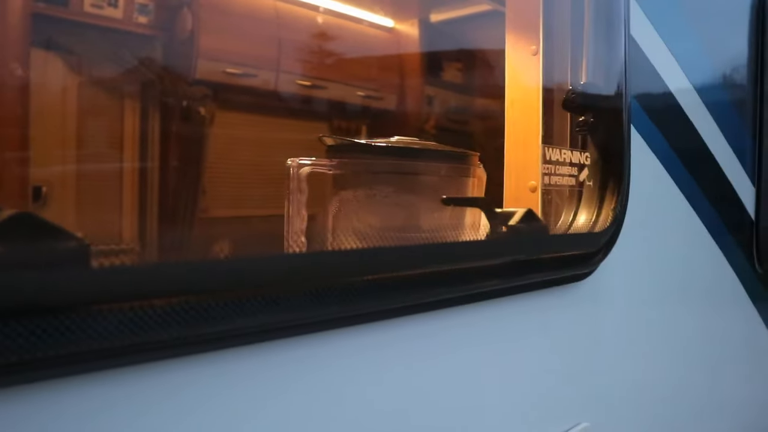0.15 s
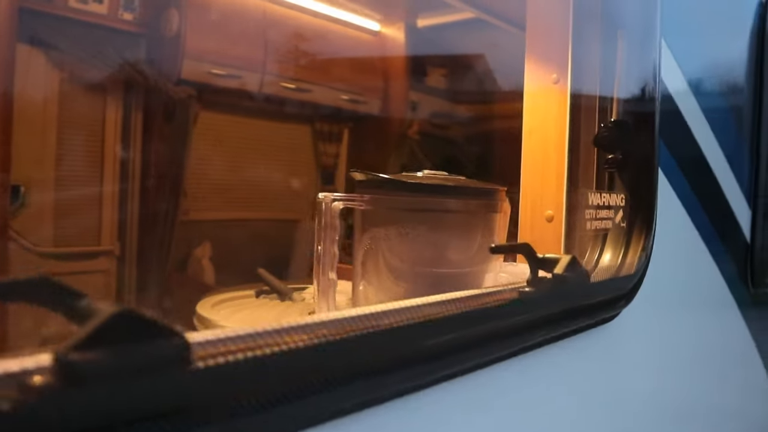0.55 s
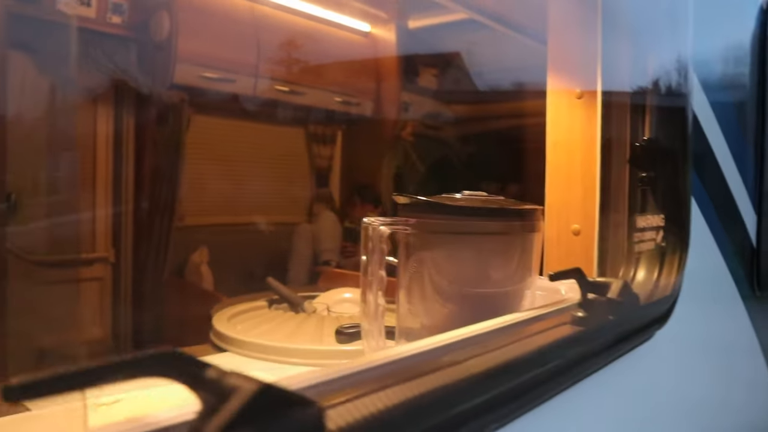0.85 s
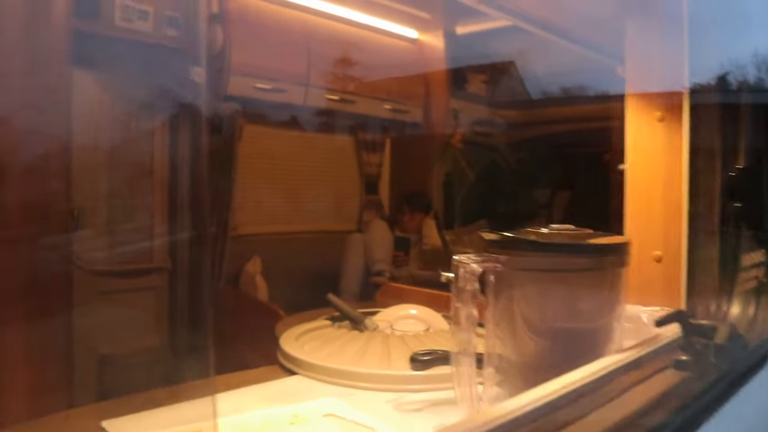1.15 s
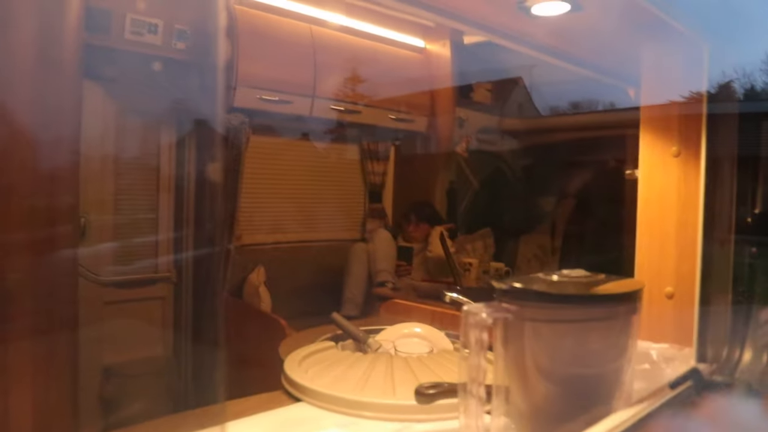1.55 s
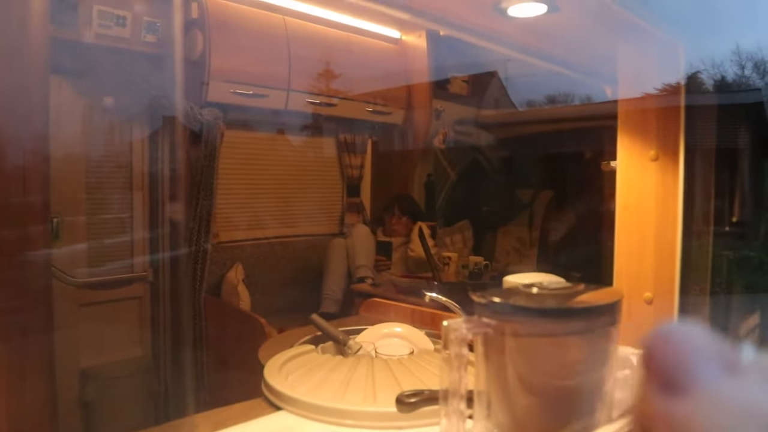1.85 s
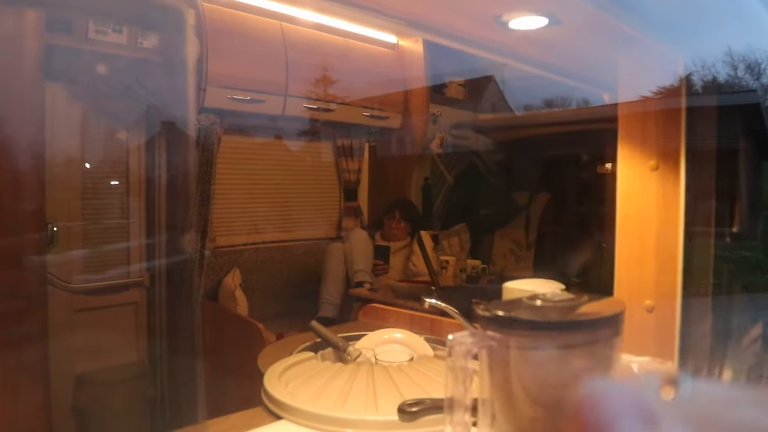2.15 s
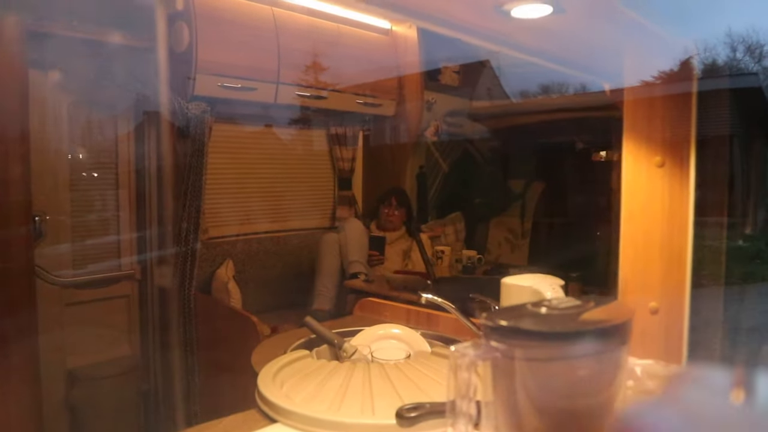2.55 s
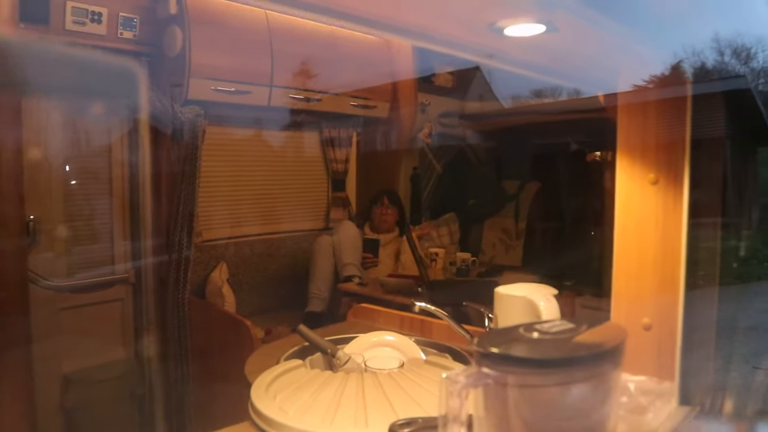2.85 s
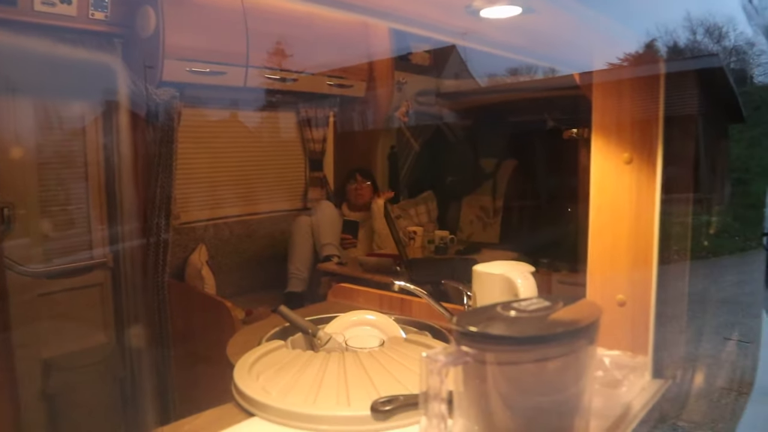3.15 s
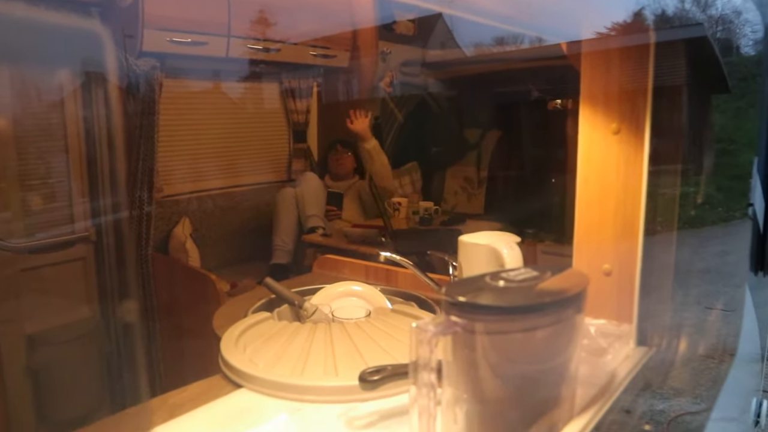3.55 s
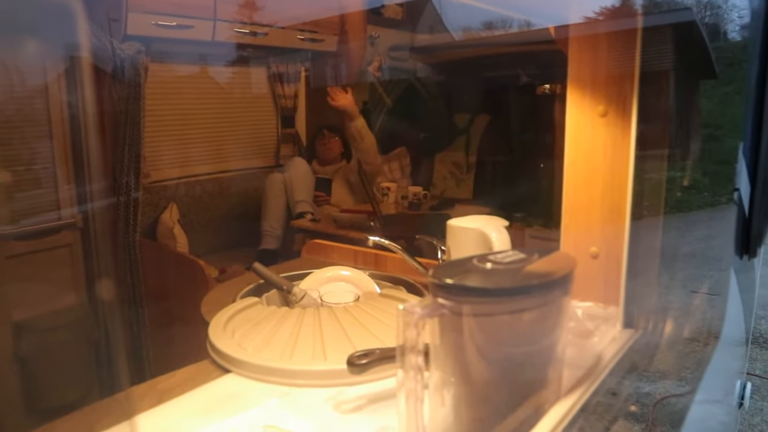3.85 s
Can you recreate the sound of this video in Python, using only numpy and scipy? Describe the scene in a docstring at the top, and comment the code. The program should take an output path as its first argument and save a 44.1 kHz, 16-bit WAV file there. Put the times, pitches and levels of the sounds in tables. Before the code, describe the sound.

Close handling rustle and sharp clicks with a hard buckle snap, then six loud evenly spaced knuckle raps on a plastic camper window, outdoors.

```python
"""A knuckle raps six times on a camper's plastic window, close to a hand-held camera: damped pane modes.
Noise bursts give skin tick, crack, frame buzz and cabin boom; a loose catch slaps and jingles after each rap.
The holder steps up: ringing clicks and a buckle snap, sine thuds, dry pricks, noise of cloth and gripped shell.
Far traffic hums as dull noise, and a car draws nearer late on. A decaying noise tail echoes the small parts.
The camera's gain control ducks under loud sounds and creeps back; overload is rounded, the top cut off."""
import sys
import numpy as np
from scipy import signal
from scipy.fft import rfft, irfft, next_fast_len
from scipy.io import wavfile
from scipy.ndimage import uniform_filter1d, map_coordinates

SR = 44100
rng = np.random.default_rng(int(sys.argv[2]) if len(sys.argv) > 2 else 0)


def put_to_file(sound):
    """Save the sound as 16-bit audio at rate SR, in the file named by the first command-line argument."""
    columns = np.atleast_2d(sound).T  # one column per channel
    safe = np.clip(columns, -1, 1)
    whole_steps = np.round(safe * 32767)
    wavfile.write(sys.argv[1], SR, whole_steps.astype(np.int16))


N = 176488

# All spectra are relative: rush() scales its noise to rms 1.
# far traffic spectrum: (frequency [Hz], density [dB per Hz])
TRAFFIC_SPECTRUM = [(15, -39), (28, -10), (53, -7), (76, -13), (108, -2), (142, -8), (184, -4.5),
                    (273, -16.5), (449, -15), (790, -19), (1390, -25.5), (2250, -36), (2800, -45),
                    (4490, -55), (6500, -67.5), (9880, -120)]
# nearing car spectrum: (frequency [Hz], density [dB per Hz])
CAR_SPECTRUM = [(20, -30), (40, -0.9), (90, -2.5), (250, -11), (700, -20), (1200, -21.5), (1800, -19.5),
                (2500, -22.5), (3300, -41), (6000, -120)]
# nearing car level: (time [s], level [dB])
CAR_LEVEL = [(2.6, -59.5), (3.1, -52), (3.5, -43.5), (4.01, -44)]
# noise at the two ports: (frequency [Hz], left-right correlation [-1 to 1])
PORT_LIKENESS = [(60, 1), (110, .999), (200, 0.99), (400, 0.94), (700, 0.89), (1200, .7), (2200, 0.56),
                 (4000, -0.29), (9000, -0.62)]
# echo decay outdoors: (frequency [Hz], t60 [s])
YARD_DECAY = [(100, 0.083), (600, 0.25), (3000, 0.057), (10000, 0.021)]
# holder's movements: (time [s], sleeve rub [dB], jacket swish [dB], shell hum before port gains [dB])
MOVES = [(0, -34, -52, -59), (.055, -32, -53, -36), (.085, -28.5, -41, -34), (.125, -38, -43.5, -44),
         (.175, -27.5, -51.5, -45), (.30, -42.5, -53.5, -58), (.34, -23, -44.5, -48),
         (.40, -29, -50.5, -41), (.51, -41.5, -51, -54), (.62, -33, -51, -38), (.72, -30, -47.5, -34.5),
         (.82, -34.5, -50.5, -35.5), (.95, -41.5, -50, -43), (.983, -36, -48.5, -46.5),
         (.988, -35, -35.5, -35), (.997, -34.5, -42.5, -33), (1.14, -33, -45.5, -60),
         (1.4, -45, -46.5, -63), (1.76, -40, -44.5, -74), (1.85, -51.5, -50, -70.5), (2.6, -62.5, -56, -69),
         (3.3, -47.5, -49.5, -67.5), (4.01, -40.5, -47.5, -74.5)]
# sleeve rub spectrum: (frequency [Hz], density [dB per Hz])
RUB_SPECTRUM = [(35, -48), (60, 4.5), (322, -10.5), (399, -13), (752, -9.5), (838, -10), (1250, -12),
                (1600, -18.5), (2070, -21.5), (2900, -29.5), (4490, -49), (5840, -80.5), (9880, -120)]
# jacket swish spectrum: (frequency [Hz], density [dB per Hz])
SWISH_SPECTRUM = [(800, -120), (1200, -8), (2500, -14.5), (4000, -20), (6000, -25), (9500, -30),
                  (12000, -43.5), (15000, -62)]
# lowest bends of the camera shell: (frequency [Hz], width of one resonator pass [Hz], relative level [dB])
SHELL_BENDS = [(326, 72, 4), (780, 160, -8.5)]
# camera body clicks: (time [s], level [dB], added L-R [dB], tilt [dB per octave], share of free t60 [1])
CLICKS = [(0.0502, -19, 9, -9, 0.7), (0.0649, -18.5, 12, -11, 0.91), (0.0687, -18.5, 10, -11, 0.63),
          (.070, -16.5, 6, -3, .9), (0.4249, -10.5, -2, 2.5, .9), (0.435, -37, 0.1, -3, .9),
          (0.6675, -25.5, -3, -7, 1), (0.7328, -26.5, 8, 9, .9), (0.7409, -4.5, -3, 4.5, 0.83),
          (0.7545, -28, -1, -7, .9), (0.9815, -29, 2, -6, .9), (.988, -34, 2, 8, .7),
          (1.028, -29, -6, -8, 1), (1.7539, -21.5, -5, 4, 0.37)]
# camera shell modes: (frequency [Hz], relative level [dB], free t60 [s])
SHELL_MODES = [(1500, -2.5, 0.004), (2196, 11.5, 0.0084), (2743, 6, 0.006), (3200, -13, .005),
               (3770, -4.5, 0.0094), (4450, -9, 0.0046), (5180, -10, 0.005)]
# shell modes at the ports: (frequency [Hz], L-R [dB], left lead [rad])
SHELL_AT_PORTS = [(1496, -8.5, 1.9), (2200, -9.5, 0.6), (2750, -2, 0.5), (3750, 0, -1.9), (5000, 2.5, -2)]
# a buckle snaps against the camera: (time [s], peak [dB])
SNAPS = [(0.2027, 2.06)]
# buckle modes: (frequency [Hz], relative level [dB], t60 [s])
BUCKLE_MODES = [(1128, -13.5, 0.014), (1470, -13, 0.011), (2220, -13, 0.0046), (2738, -5, 0.018),
                (2770, -32, 0.093), (2917, -6.5, 0.019), (3440, -11.5, 0.0173), (4090, -15.5, 0.018),
                (4900, -16.5, 0.018), (5870, -14.5, 0.007), (6860, -17.5, 0.013), (7600, -18, 0.009),
                (8950, -15.5, 0.00495), (10010, -25, 0.0057), (10680, -25, 0.0086), (12070, -33, .005),
                (13480, -45.5, 0.0036)]
# buckle modes at the ports: (frequency [Hz], L-R [dB], left lead [rad])
BUCKLE_AT_PORTS = [(1500, -3, 1.1), (2200, 6, 2.6), (2700, 8, .5), (2950, 8, .2), (3750, 0, -1.4),
                   (5000, 2, -2.9), (7500, 4, -3.2), (10000, 7, -3), (13000, 1, -3)]
# dry pricks of a fingertip or strap on the shell: (time [s], level [dB], push width [s], L-R [dB])
PRICKS = [(.0499, -22, 0.00015, 5.5), (.0655, -16, 0.00015, 1), (0.084, -24, .00016, -0.2),
          (0.685, -25, 0.00026, 2), (0.7346, -26, 0.000091, 0.1), (0.7652, -26, 0.00017, 0.1),
          (1.0523, -24, 0.00011, 0.1), (1.7536, -25, 0.000063, -1.5)]
# soft steps and bumps: (time [s], level before the rise [dB], frequency [Hz], t60 [s])
THUDS = [(0.066, -18.5, 82.5, 0.23), (0.064, -16, 314, 0.042), (0.068, -18, 1440, 0.025),
         (0.151, -15.5, 114, 0.088), (0.233, -9, 74, 0.12), (0.361, -33, 141, 0.14), (.764, -17, 300, 0.04),
         (.7655, -19.5, 850, 0.024), (0.985, -14, 179, 0.066), (0.988, -23, 55.4, 0.53),
         (1.046, -21.5, 108, 0.096), (1.722, -19.5, 131, 0.33), (1.961, -20.5, 140, 0.13),
         (3.271, -17.5, 45, 0.18), (3.489, -23, 105.6, 0.37), (3.928, -24, 156, 0.3)]
# catch slaps its seat and rebounds: (time [s], relative level [dB])
SLAPS = [(1.805, -14.5), (2.0310, -11), (2.0387, -32), (2.2422, -14.5), (2.2496, -24.5), (2.4470, -10),
         (2.455, -26), (2.6623, -6), (2.666, -25), (2.8723, -8.5), (2.8790, -36)]
# catch seat modes: (frequency [Hz], relative level [dB], t60 [s])
SEAT_MODES = [(1340, -5, 0.017), (1740, 2, 0.014), (2400, 3.5, 0.0035), (3000, 0, 0.005), (3970, 3, 0.0044),
              (4610, -4.5, 0.0032), (5300, -10.5, 0.0046), (6200, -14, 0.0041), (6900, -10, 0.0037),
              (7760, -16.5, 0.0055)]
# seat modes at the ports: (frequency [Hz], L-R [dB], left lead [rad])
SEAT_AT_PORTS = [(1500, 3.5, 0.65), (2200, 2.5, .55), (2840, 7, 1.1), (3750, 6.5, 1.2), (5000, 12.5, 1.5),
                 (7500, 4, 1.8)]
# catch jingles: (time [s], peak of the ring [dB], tilt [dB per octave])
JINGLES = [(1.8273, -38, 0.1), (2.0548, -37, 3), (2.0773, -47, 1), (2.1127, -48, 0.1), (2.266, -36, 8),
           (2.2906, -37, 5.5), (2.3483, -52, -5), (2.3871, -52, -1), (2.4716, -33.5, 6), (2.4970, -37, 5),
           (2.5531, -47, 3), (2.6883, -32, 4), (2.714, -39, -3), (2.795, -50, 0.1), (2.899, -40.5, 1),
           (2.924, -38.5, 0.1), (2.981, -45, 0.1)]
# loose catch modes: (frequency [Hz], relative level [dB], t60 [s])
CATCH_MODES = [(2900, -7.5, .005), (3670, 1, .007), (4500, -7.5, .004), (5260, 0.5, 0.0055),
               (7100, -7, 0.0071)]
# catch modes at the ports: (frequency [Hz], L-R [dB], left lead [rad])
CATCH_AT_PORTS = [(2850, -4, -1.0), (3750, -1.5, -.8), (5200, -3.5, -.2), (7200, -1.5, -1.8)]
# frame and blind buzz spectrum: (frequency [Hz], density [dB per Hz])
BUZZ_SPECTRUM = [(700, -120), (1200, 3.5), (2500, -5.5), (4500, -17), (7000, -27), (10000, -27),
                 (15000, -63)]
# spectrum of the cabin behind the pane: (frequency [Hz], density [dB per Hz])
CABIN_SPECTRUM = [(60, -120), (120, 6), (300, 0), (600, -8.5), (1000, -21.5), (1800, -120)]
# skin on plastic spectrum: (frequency [Hz], density [dB per Hz])
TICK_SPECTRUM = [(1000, -120), (1800, -0.5), (3000, -7.5), (5000, -9), (6500, -17), (8500, -16),
                 (11000, -32), (15000, -60.5)]
# spectrum of the pane's dense upper modes: (frequency [Hz], density [dB per Hz])
CRACK_SPECTRUM = [(400, -120), (750, 3), (1200, -8), (1600, -22), (2500, -28.5), (4000, -46.5),
                  (7000, -120)]
# knuckle blows: (time [s], relative strength [dB], skin tick [dB], relative frame and cabin shaking [dB],
#   struck spot across [cm], struck spot up [cm], knuckle slant [1])
RAPS = [(1.79, 12.4, -36, 16.5, -1, 0.67, -0.35), (2.0166, 9.5, -33.5, 13.5, -0.35, -0.34, 0.13),
        (2.2274, 10, -41, 17, 0.4, -1.2, 0.78), (2.4328, 11, -24, 17.5, 0.87, -0.5, -1.84),
        (2.648, 9, -18.5, 21, 1.5, -0.1, 0.41), (2.8581, 4.5, -33, 17.5, 1.44, 3.5, 0.73)]
# pane modes: (frequency [Hz], relative level [dB], t60 [s], first swing at the usual spot [1],
#   its change across [per cm], its change up [per cm], its change with slant [per unit])
PANE_MODES = [(41.96, -20.5, 0.52, 0.84, 0.12, 0.12, -0.058), (47.3, -18.5, 0.41, 0.92, 0.29, 0.12, 0.14),
              (81, -14.5, 0.24, -0.98, -0.2, 0.039, -0.073),
              (97.7, -10.5, 0.051, -0.9, -0.43, -0.35, -0.02),
              (142.2, -16.5, 0.19, -0.95, -0.18, -0.46, 0.05), (185, -7, 0.078, -0.95, -0.19, -0.2, -0.26),
              (237.6, -8, 0.1, -1.02, -0.27, -0.093, -0.061), (274, -11.1, 0.087, -0.8, -0.35, 0.045, 0.4),
              (301, 0.5, 0.02, 0.96, -0.056, 0.28, 0.0073), (360, -20.5, 0.14, 0.66, 0.47, -0.038, -0.55),
              (378, -9, 0.069, -0.8, -0.051, 0.36, 0.25), (428, -9, 0.096, 0.88, -0.057, -0.17, 0.32),
              (461.4, -1.2, 0.038, 0.08, 0.95, 0.015, -0.046),
              (511, -6.5, 0.063, -0.7, -0.42, -0.27, -0.38), (558.5, -0.5, 0.032, -0.91, 0.38, 0.2, -0.082),
              (594, -3, 0.025, 0.22, -0.76, -0.48, 0.076), (643, -27.5, 0.048, -0.81, -0.25, 0.38, 0.29),
              (702, -6.5, 0.043, -0.85, -0.56, 0.049, 0.029), (757.5, -22, 0.063, -0.67, 0.15, 0.48, -0.75),
              (840, -7.5, 0.026, -0.83, -0.49, 0.38, 0.2), (890, -9, 0.028, 0.38, -0.83, -0.21, -0.34),
              (936.8, -18.5, 0.014, 0.59, -0.074, 0.26, 0.22),
              (1050.7, -28, 0.035, 0.71, 0.18, -0.16, 0.01),
              (1134.9, -9.5, 0.028, 0.41, 0.75, -0.31, -0.27),
              (1320, -21, 0.021, -0.61, -0.36, -0.42, -0.76), (1450, -9, 0.03, -0.77, 0.32, -0.083, -0.072),
              (1700, -28.5, 0.015, 0.92, 0.1, 0.1, 0.1), (1960, -24, 0.012, -0.6, 0.3, 0.1, 0.1)]

CONTACT_S = 0.0012
TOP_HZ = 15700
KNEE_POWER = 7  # higher = sharper overload knee


def amp(db):
    """Decibels to gain."""
    return 10 ** (np.asarray(db) / 20)


def unit(x):
    """Scaled to rms 1."""
    return x / np.sqrt(np.mean(x ** 2) + 1e-20)


def along(points, hz):
    """(frequency [Hz], value) points interpolated on a log axis."""
    f, v = np.transpose(points)
    return np.interp(np.log(hz + 1), np.log(f + 1), v)


def curves(rows):
    """One value per sample for each column after the time."""
    s, *cols = np.transpose(rows)
    return [np.interp(np.arange(N) / SR, s, c) for c in cols]


def wobble(rate_hz):
    """Smooth random curve, rate_hz knots a second."""
    knots = rng.standard_normal(int(N * rate_hz / SR) + 4)
    return map_coordinates(knots, [np.arange(N) * rate_hz / SR])


def filtered(x, response):
    """x times a complex response of frequency."""
    m = next_fast_len(N + SR // 2)
    return irfft(rfft(x, m) * response(np.fft.rfftfreq(m, 1 / SR)), m)[..., :N]


def add(track, s, sound):
    """Mix a sound into the track at s seconds."""
    part = track[..., round(s * SR):][..., :sound.shape[-1]]
    part += sound[..., :part.shape[-1]]


def pan(db):
    """Port gains for a left-right difference."""
    return amp(db / 2 * np.array([[1], [-1]]))


def ports(x, lag_s):
    """Path difference: left hears the sound lag_s later than right."""
    return filtered(x, lambda hz: np.exp(-1j * np.pi * hz * lag_s * np.array([[1], [-1]])))


def rush(spectrum, patchy_db, grain_db):
    """Stereo noise of rms 1 with time-frequency patches of random gain and a fast level grain."""
    z = signal.stft(rng.standard_normal((2, N)), nperseg=512)[2]
    field = uniform_filter1d(rng.standard_normal(z.shape[1:]), 6, 0)
    patches = amp(patchy_db * unit(uniform_filter1d(field, 10, 1)))
    pair = signal.istft(z * patches, nperseg=512)[1][:, :N]
    pair = pair * amp(grain_db * wobble(250))

    def mid_side(hz):
        angle = np.arccos(np.clip(along(PORT_LIKENESS, hz), -1, 1)) / 2
        return amp(along(spectrum, hz)) * [np.cos(angle), np.sin(angle)]

    mid, side = filtered(pair, mid_side)
    return unit(np.array([mid + side, mid - side]))


def ring(modes, heard, scatter_db, scatter_rad, attack_s, flip):
    """Struck small part: damped modes with port balance and lead, peak 1; mode k is scaled by flip ** k."""
    t = np.arange(SR // 8) / SR
    half = np.array([[.5], [-.5]])
    at_hz, pan_db, lead_rad = np.transpose(heard)
    chance = rng.standard_normal((len(modes), 2))
    sound = 0
    for k, ((hz, db, t60), (a, b)) in enumerate(zip(modes, chance)):
        level_db = db + scatter_db * a + half * np.interp(hz, at_hz, pan_db)
        phase = scatter_rad * b + half * np.interp(hz, at_hz, lead_rad)
        sound = sound + flip ** k * amp(level_db - 60 * t / t60) * np.sin(2 * np.pi * hz * t + phase)
    sound = sound * (1 - np.exp(-t / attack_s)) ** 2
    return sound / np.abs(sound).max()


def traffic():
    """Far, dull, slowly drifting noise; late on, one car grows out of it."""
    drift_db = 0.8 * wobble(2)
    car = amp(curves(CAR_LEVEL)[0]) * rush(CAR_SPECTRUM, patchy_db=0.5, grain_db=0.7)
    return amp(-35.5 + drift_db) * rush(TRAFFIC_SPECTRUM, patchy_db=1.5, grain_db=0.7) + car


def yard(x):
    """Van wall, ground and sheds answer: a noise tail, each frequency dying at its own speed."""
    hz, t, z = signal.stft(rng.standard_normal((2, SR // 3)), SR, nperseg=256)
    decay = amp(-60 * t / along(YARD_DECAY, hz)[:, None])
    tail = signal.istft(z * decay, SR, nperseg=256)[1]
    delayed = np.pad(x, ((0, 0), (150, 0)))  # samples
    return signal.fftconvolve(delayed, tail / np.linalg.norm(tail[0]), axes=1)[:, :N]


def cloth():
    """Friction noise: sleeves rub and the jacket swishes along the level curves of the movements."""
    rub_db, swish_db, _ = curves(MOVES)
    rubbing = amp(rub_db + 0.86 * wobble(25)) * rush(RUB_SPECTRUM, patchy_db=3.0, grain_db=2.0)
    return rubbing + amp(swish_db) * rush(SWISH_SPECTRUM, patchy_db=1.0, grain_db=1.0)


def grip():
    """Narrow noise at the shell's lowest bends, which move the two ports unequally and oppositely."""
    def bends(f):
        return sum(amp(db) * (1j * f * w / (hz * hz - f * f + 1j * f * w)) ** 2
                   for hz, w, db in SHELL_BENDS)

    hum = unit(filtered(rng.standard_normal(N), bends))
    return amp(curves(MOVES)[-1]) * hum * np.array([[1.6], [-.4]])


def handling():
    """Clicks and snap ring the camera body, pricks push it; thuds, damped sines, reach both ports alike."""
    clicks, low, t = np.zeros((2, N)), np.zeros(N), np.arange(SR // 3) / SR
    for s, db, pan_db, tilt_db, share in CLICKS:
        shell = [(hz, level + tilt_db * np.log2(hz / 2200), t60 * share) for hz, level, t60 in SHELL_MODES]
        click = ring(shell, SHELL_AT_PORTS, scatter_db=1.4, scatter_rad=0.25, attack_s=0.00033, flip=-1.05)
        add(clicks, s, amp(db) * pan(pan_db) * click)
    for s, db in SNAPS:
        snap = ring(BUCKLE_MODES, BUCKLE_AT_PORTS, scatter_db=-0.2, scatter_rad=0.15,
                    attack_s=0.00024, flip=1)
        add(clicks, s, amp(db) * snap)
    for s, db, push_s, pan_db in PRICKS:
        u = (t[:SR // 100] - 0.001) / push_s  # rounded push, its top at s
        add(clicks, s - 0.001, amp(db) * pan(pan_db) * (1 - 0.3 * u ** 2) * np.exp(-u ** 2 / 2))
    for s, db, hz, t60 in THUDS:
        rise = 1 - np.exp(-t * hz / 0.7)  # soft contact: time constant 0.7 cycle
        add(low, s, amp(db - 60 * t / t60) * rise * np.sin(2 * np.pi * hz * t))
    return clicks + low


def catch():
    """Loose catch: seat modes at each slap, then jingles of its own modes; both shake buzz from the frame."""
    out, shake, t = np.zeros((2, N)), np.zeros(N), np.arange(SR // 8) / SR
    onset = 1 - np.exp(-t / 0.0012)
    for s, db in SLAPS:
        slap = ring(SEAT_MODES, SEAT_AT_PORTS, scatter_db=1.1, scatter_rad=0.24, attack_s=0.0001, flip=-1.006)
        add(out, s, amp(db + 3.0) * slap)
        add(shake, s, amp(db - 14.5 - 60 * t / 0.046) * onset)
    for s, db, tilt_db in JINGLES:
        modes = [(hz, level + tilt_db * np.log2(hz / 4500), t60) for hz, level, t60 in CATCH_MODES]
        jingle = ring(modes, CATCH_AT_PORTS, scatter_db=2.5, scatter_rad=0.6, attack_s=0.0006, flip=-0.9)
        add(out, s, amp(db) * jingle)
        add(shake, s, amp(db - 5.5 - 60 * t / 0.04) * onset)
    return out + shake * rush(BUZZ_SPECTRUM, patchy_db=-0.5, grain_db=2.0)


def window():
    """The knuckle's short push swings the pane modes; struck spot and slant set their balance."""
    pane, t = np.zeros((2, N)), np.arange(SR // 3) / SR
    skin, crack, frame, cabin = np.zeros((4, N))
    hz, level, t60, side, across, up, lean = np.transpose(PANE_MODES)[..., None, None]
    scatter_share = np.minimum(hz / 300, 1)  # low modes get less random level scatter
    push = np.sin(np.pi * np.minimum(t[:SR // 200] / CONTACT_S, 1))[None] ** 2
    for s, db, skin_db, shake_db, across_cm, up_cm, slant in RAPS:
        chance = rng.standard_normal((len(PANE_MODES), 3, 1))  # per mode: one shared, one per port
        mode_db = level + scatter_share * (0.47 * chance[:, :1] + 0.46 * chance[:, 1:])
        first_swing = side + across * across_cm + up * up_cm + lean * slant
        modes = first_swing * amp(mode_db - 60 * t / t60) * np.cos(2 * np.pi * hz * t)
        swing = np.sum(modes, axis=0)
        add(pane, s, amp(db - 3.0) * signal.fftconvolve(swing, push / push.sum(), axes=1))
        add(skin, s - 0.0013, amp(skin_db - 60 * t / 0.0094) * (1 - np.exp(-t / 0.00048)))
        add(crack, s, amp(shake_db - 30.0 - 60 * t / 0.066) * (1 - np.exp(-t / 0.0015)) ** 2)
        add(frame, s, amp(shake_db - 46.0 - 60 * t / 0.14) * (1 - np.exp(-t / 0.0013)))
        # blurred boom back through the pane
        add(cabin, s, amp(shake_db - 26.0 - 60 * t / 0.19) * (1 - np.exp(-t / 0.0053)))
    out = ports(pane, lag_s=-0.000022)
    out = out + crack * rush(CRACK_SPECTRUM, patchy_db=-1.0, grain_db=3.0)
    out = out + frame * rush(BUZZ_SPECTRUM, patchy_db=4.0, grain_db=2)
    out = out + cabin * rush(CABIN_SPECTRUM, patchy_db=0.5, grain_db=-0.3)
    return out + skin * rush(TICK_SPECTRUM, patchy_db=5.0, grain_db=0.5)


def scene():
    """Everything that reaches the two ports; catch and handling also echo."""
    pane, metal, hands = window(), catch(), handling()
    echoes = yard(amp(-20.5) * metal + amp(-26.0) * hands)
    return pane + metal + hands + echoes + grip() + cloth() + traffic()


def gain_control(x, limit_db, attack_share, hold_s, release_db_per_s):
    """Loud 1 ms blocks pull the gain down by a share of the gap; after a hold it climbs back steadily."""
    size = SR // 1000
    peaks = np.abs(x[:, :N // size * size]).max(axis=0).reshape(-1, size).max(axis=1)
    gain_db, wait_s, trace = 0, 0, []
    for need_db in limit_db - 20 * np.log10(peaks + 1e-9):
        if need_db < gain_db:
            gain_db, wait_s = gain_db + attack_share * (need_db - gain_db), hold_s
        elif wait_s > 0:
            wait_s -= size / SR
        else:
            gain_db = min(0, gain_db + release_db_per_s * size / SR)
        trace.append(gain_db)
    return x * amp(np.interp(np.arange(N), (np.arange(len(trace)) + 1) * size, trace))


def record(dry):
    """Gain control, overload rounded at full scale, band limit."""
    x = gain_control(dry, limit_db=-5, attack_share=0.15, hold_s=0.36, release_db_per_s=5.5)
    x = x / (1 + np.abs(x) ** KNEE_POWER) ** (1 / KNEE_POWER)
    return filtered(x, lambda hz: hz < TOP_HZ)


dry = scene()
out = record(dry)
put_to_file(out)
```